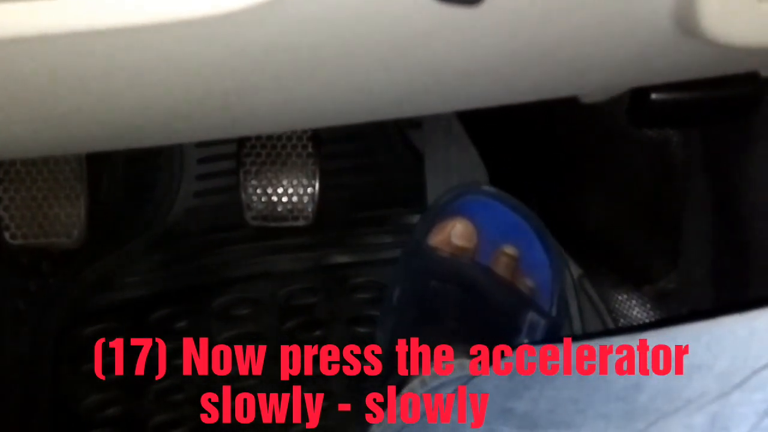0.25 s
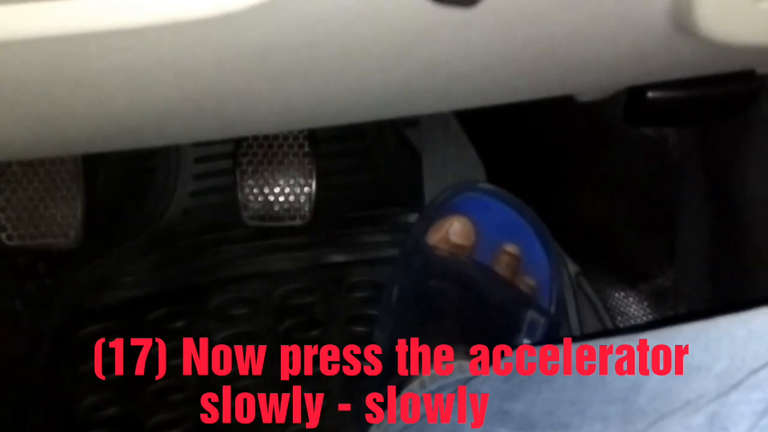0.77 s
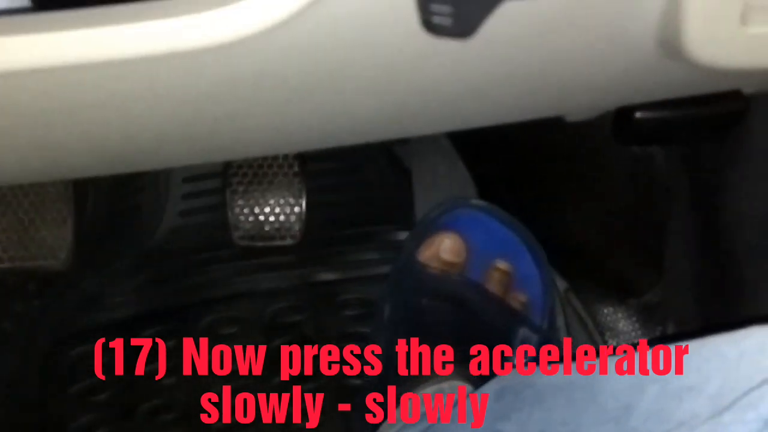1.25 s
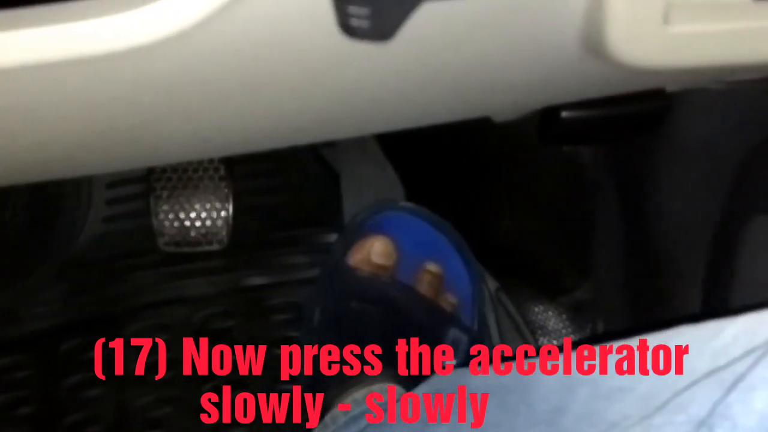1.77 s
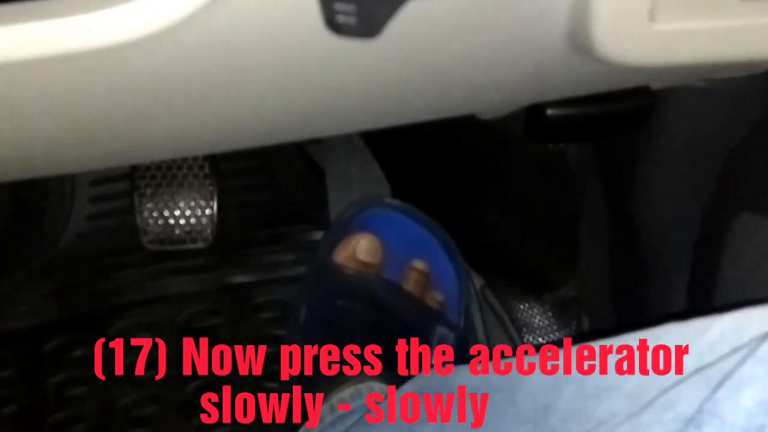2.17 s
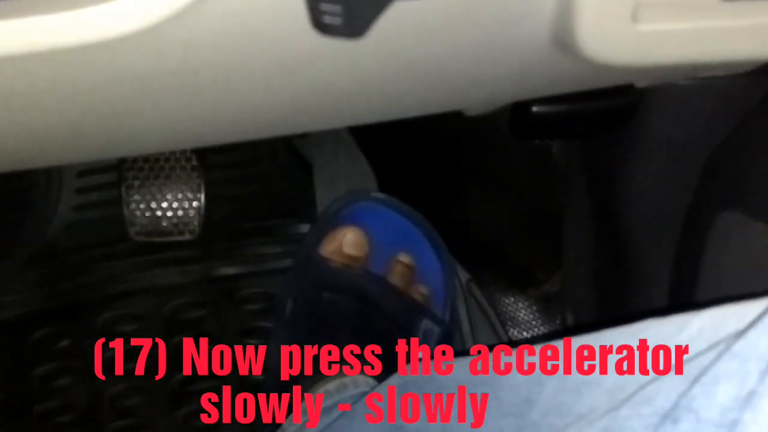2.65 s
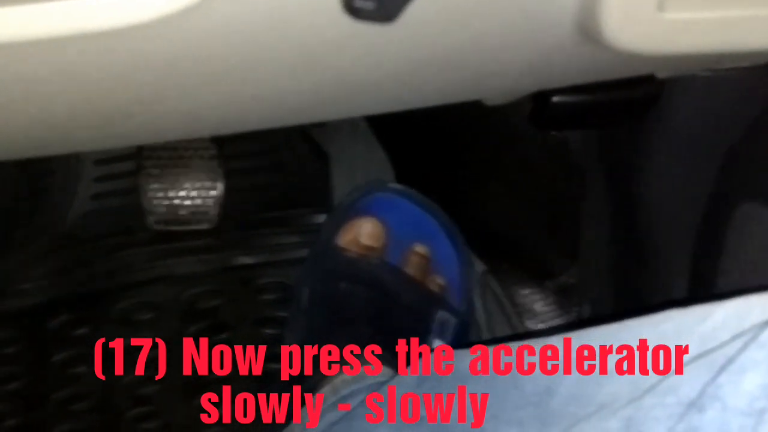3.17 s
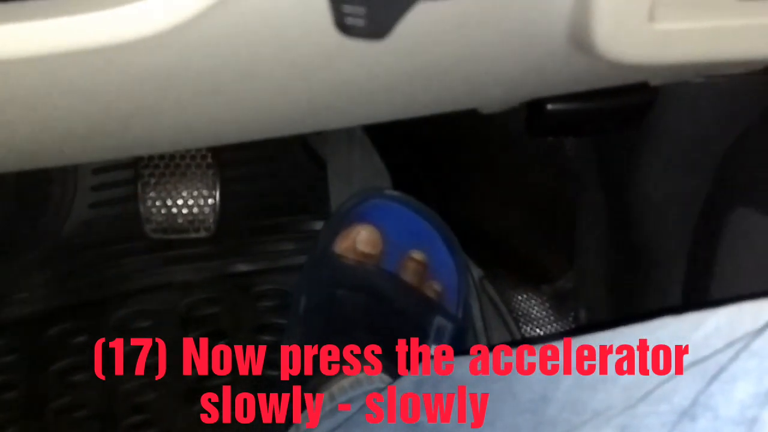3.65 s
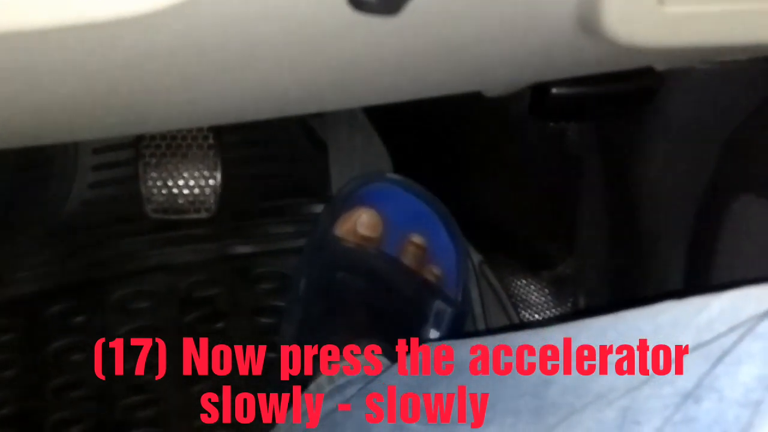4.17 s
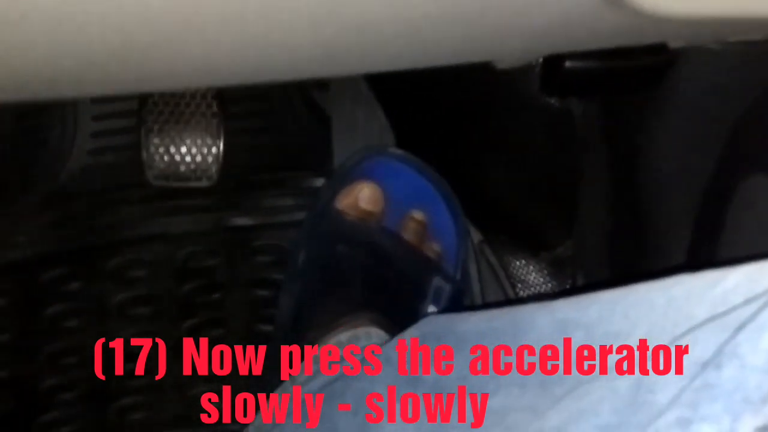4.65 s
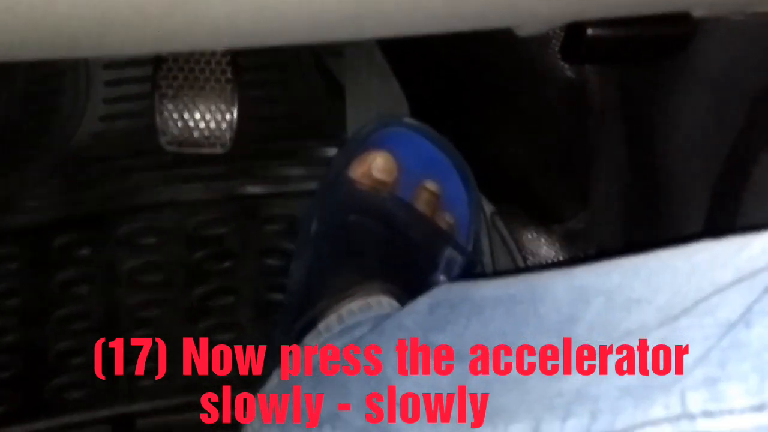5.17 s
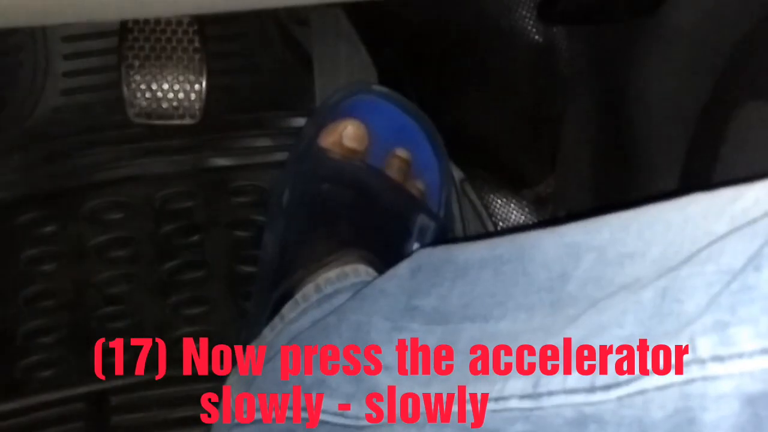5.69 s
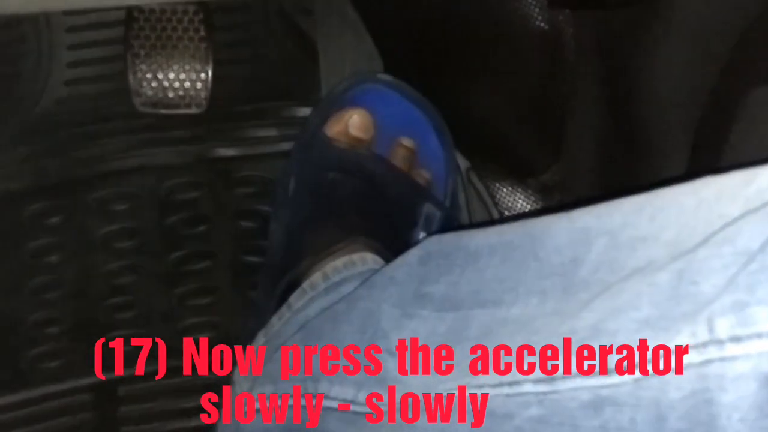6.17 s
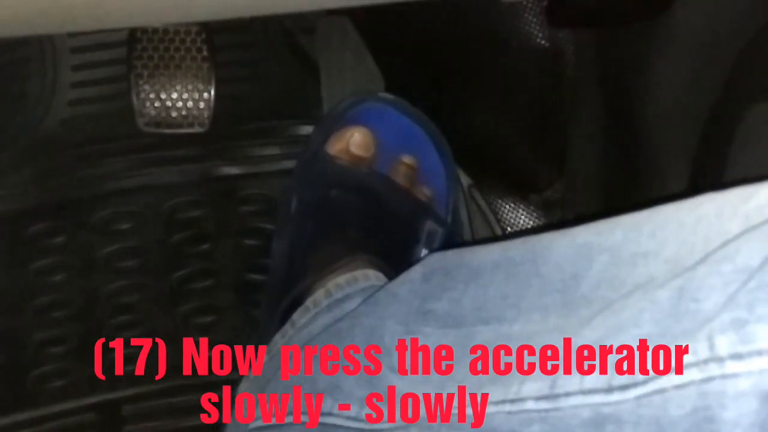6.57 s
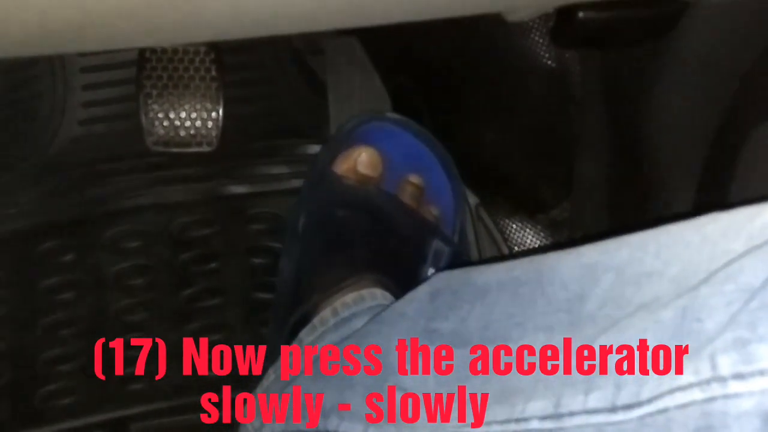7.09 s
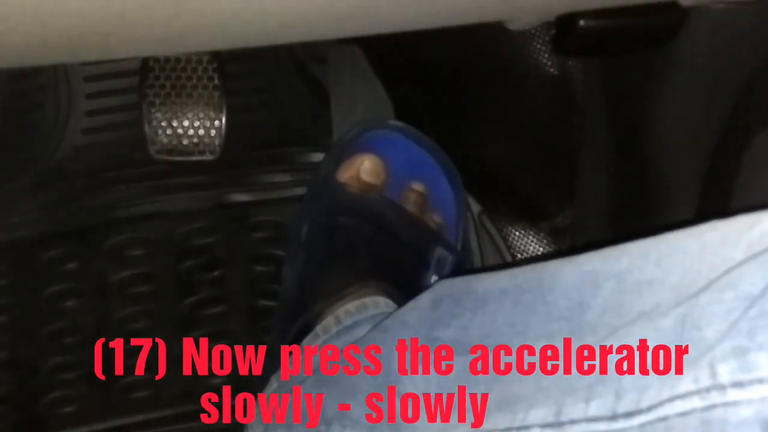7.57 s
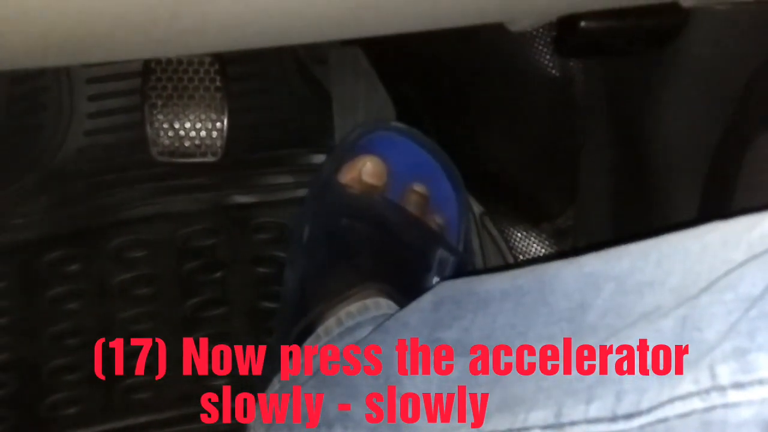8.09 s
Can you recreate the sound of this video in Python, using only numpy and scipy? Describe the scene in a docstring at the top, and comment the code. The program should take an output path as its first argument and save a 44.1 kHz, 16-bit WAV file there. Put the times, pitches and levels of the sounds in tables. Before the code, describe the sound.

Low, boomy engine rumble inside a car swells and falls twice, settles to idle, then climbs smoothly, while a hand rustles and a shoe knocks.

```python
"""Car engine heard from the footwell

A three-cylinder engine near idle is blipped twice, sinks back, then is revved gently. Sines on its orders
sweep through cabin resonances, over noise for the rough rumble, a trailing hum, a fuzzy buzz and a pump hum.
Shaped noise gives a hand rustling by the left microphone port, cloth shuffling and a sole scraping.
Short pulses tick on the casing, and a foot's knocks ring the floor panel."""
import sys
import numpy as np
from scipy import signal
from scipy.io import wavfile
from scipy.ndimage import uniform_filter1d

SR = 44100
rng = np.random.default_rng(int(sys.argv[2]) if len(sys.argv) > 2 else 0)


def persist_wave(psi):
    """Save psi, clipped to +-1, as 16-bit WAV."""
    counts = np.round(np.clip(psi, -1, 1) * 32767).astype(np.int16)
    wavfile.write(sys.argv[1], SR, np.atleast_2d(counts).T)


def undo_db(level):
    """Turn decibels back into plain size, where 20 dB means ten times bigger."""
    steps = np.asarray(level, float) / 20
    return 10 ** steps


N = 367352
TIME = np.arange(N) / SR
HOP = 256  # samples between the values of a slow curve
HZ = np.fft.rfftfreq(4096, 1 / SR)

# Engine speed. Each row: time in s, firings per s.
SPEED = [(0.0, 20.05), (0.15, 21.9), (0.3, 25.5), (0.5, 31.6), (0.6, 36.8), (0.7, 39.9), (0.8, 41.95),
         (0.9, 43.35), (1.0, 43.0), (1.1, 40.1), (1.3, 35.1), (1.4, 30.65), (1.5, 28.55), (1.65, 28.25),
         (1.8, 28.35), (2.0, 29.2), (2.35, 31.05), (2.5, 30.45), (2.7, 28.4), (3.0, 26.65), (3.3, 25.3),
         (3.6, 24.4), (3.9, 22.7), (4.2, 22.0), (4.9, 21.6), (5.2, 21.35), (5.6, 20.65), (6.6, 20.75),
         (6.8, 21.8), (7.0, 24.2), (7.15, 27.4), (7.3, 29.15), (7.6, 31.85), (8.33, 34.3)]
# Strong upper orders ahead of the cabin. Each row: multiple of the two-turn cycle, rms level in dB.
ORDERS = [(4, -39), (6, -38.5), (9, -45), (10, -48.5), (12, -52.5), (15, -42.5), (18, -51), (21, -46.5),
          (24, -49), (27, -49.5), (30, -48.5), (33, -54), (36, -51.5), (39, -58.5), (42, -51), (45, -55.5),
          (46, -48.5)]
# Body's answer to the firings at steady speed. Each row: frequency in Hz, rms level in dB.
BOOM = [(20.5, -23), (22, -22.5), (24.5, -21), (26.8, -23), (28.3, -25), (29.3, -28.5), (30.5, -26.5),
        (33, -33), (36.5, -27), (40, -25), (43.3, -33.5)]
# Body's answer to the crankshaft's once-a-turn shake. Each row: frequency in Hz, rms level in dB.
SHAKE = [(13.9, -36.5), (14.5, -50.5), (15.2, -29.5), (17, -36), (19, -38), (21, -45.5), (22.6, -35.5),
         (24, -24), (27, -28.5), (29, -26.5)]
# Resonances of body panels and cabin air. Each row: frequency in Hz, width in Hz, gain in dB.
CABIN = [(31, 13, -16), (38, 3, 6), (59, 3.3, 0), (136.6, 6.7, -9), (195.6, 8.9, -6), (261, 5.5, -10.5),
         (301.4, 31, -12.5), (351.3, 16.4, -14.5), (402, 5.1, -17), (516, 8.5, -28), (607.5, 41, -25.5),
         (2190, 150, -43.5)]
# Transmission between the resonances. Each row: frequency in Hz, gain in dB.
BULKHEAD = [(10, -16), (80, -9), (135, -18), (230, -30), (700, -35), (1400, -41), (2200, -46.5),
            (4000, -48.5), (8000, -62)]
# Resonances that ring on after an order has passed. Each row: frequency in Hz, width in Hz, lift in dB.
RINGING = [(26.92, 3.5, 0.5), (103.78, 3.66, 14)]
# Rumble ahead of the cabin. Each row: frequency in Hz, relative level in dB.
RUMBLE_COLOUR = [(11, 11), (16, 14.5), (25, 8.5), (35, 9), (55, 0.0), (80, 5.5), (100, -2), (150, -0.5),
                 (300, -3), (450, 0.5)]
# Trailing hum. Each row: frequency in Hz, rms level in dB.
TRAIL = [(80, -60.5), (90, -49.5), (95, -49), (99, -47), (103, -58), (108, -62), (120, -54)]
# Pump tones. Each row: frequency in Hz, rms level in dB.
PUMP = [(86.6, -57), (173.2, -57)]
# Likeness of the two ports. Each row: frequency in Hz, likeness from 0 to 1.
LIKENESS = [(60, 0.94), (130, 1), (290, 0.63), (640, 0.47), (1400, 0.19), (3000, 0.12)]
# Balance of the two ports. Each row: frequency in Hz, left over right in dB.
LEAN = [(60, 2.2), (150, 0.4), (300, 2.5), (600, -1.8), (1500, 1), (5000, 4), (15000, 2.5)]
# Microphone noise. Each row: frequency in Hz, relative density in dB per Hz.
HISS_COLOUR = [(880, -18.5), (1500, -10.5), (2800, -9.5), (5170, -15), (8670, -10.5), (11400, -7.5),
               (14400, -21), (15400, -48.5)]
# Strokes of skin on the casing. Each row: peak time in s, rms level in dB, rise in s, fall in s.
SKIN_STROKES = [(1.0, -56.5, 0.17, 0.45), (1.25, -53, 0.22, 0.063), (1.46, -63.5, 0.13, 0.11),
                (1.75, -60, 0.23, 0.16), (1.99, -64, 0.059, 0.21), (2.22, -62, 0.09, 0.18),
                (2.55, -62, 0.12, 0.12), (2.88, -65.5, 0.087, 0.1), (3.135, -72.5, 0.08, 0.094),
                (3.86, -61.5, 0.4, 0.11), (4.168, -68, 0.016, 0.012), (4.567, -71, 0.0058, 0.08),
                (4.65, -59, 0.033, 0.038), (4.692, -56, 0.051, 0.0037), (4.716, -59.5, 0.012, 0.12),
                (5.306, -53, .012, 0.023), (5.32, -58.5, 0.44, 0.12), (5.66, -60.5, 0.53, 0.11),
                (5.97, -67.5, 0.37, 0.3)]
# Skin friction. Each row: frequency in Hz, relative density in dB per Hz.
SKIN_COLOUR = [(2060, -37.5), (3500, -11.5), (4430, -11.5), (8660, -7), (10300, -1), (12200, -3.5),
               (13600, -2.5), (15400, -26)]
# Balance of the skin friction. Each row: frequency in Hz, left over right in dB.
SKIN_LEAN = [(3000, 16), (8000, 14), (12000, 8), (15000, -1.5)]
# Duller strokes of cloth. Each row: peak time in s, rms level in dB, rise in s, fall in s.
CLOTH_STROKES = [(1.24, -61.5, 0.027, 0.042), (1.676, -62, 0.025, 0.057), (2.27, -68, 0.011, 0.04),
                 (2.54, -68, 0.069, 0.033), (3.69, -66.5, 0.034, 0.046), (4.705, -63.5, 0.035, 0.045),
                 (4.92, -73, 0.26, 0.45), (5.19, -66.5, 0.12, 0.05), (5.32, -60, 0.1, 0.11),
                 (5.6, -66, 0.21, 0.076)]
# Cloth friction. Each row: frequency in Hz, relative density in dB per Hz.
CLOTH_COLOUR = [(500, -17), (1000, 8.5), (1500, 7.5), (2300, 6.5), (3300, 6.0), (5000, -32.0)]
# Slides of sole on mat. Each row: peak time in s, rms level in dB, rise in s, fall in s.
SOLE_STROKES = [(5.135, -66, 0.012, .02), (5.2, -68, 0.019, 0.036), (5.275, -64, 0.029, 0.024),
                (5.47, -65.5, 0.02, 0.029), (5.535, -61, 0.013, 0.023), (5.6, -58.5, 0.042, 0.038),
                (5.7, -65.5, 0.036, .02)]
# Fingertip on the casing. Each row: start in s, peak of the dull push in dB, peak of the snap in dB,
# low edge of the snap in Hz, its high edge in Hz, its left over right in dB.
TICKS = [(1.6708, -34, -37.5, 3500, 9500, 1), (4.7106, -42, -34, 6000, 15000, 16)]
# Foot on floor and pedal. Each row: start in s, peak level in dB, length in s.
KNOCKS = [(.858, -54, .004), (4.899, -50, .006), (5.274, -50, .005), (5.3008, -28, .004),
          (5.3068, -29.5, .011)]
# Floor panel modes. Each row: frequency in Hz, relative level in dB, time to fall by 60 dB in s.
FLOOR_MODES = [(110, -2, .06), (176, 2, .09), (323, 0, .08), (480, -7, .02), (640, -8, .012),
               (800, -7, .011), (1050, -5, .01), (1390, -6, .009), (1690, -7, .009), (2230, -10, .009),
               (3000, -14, .008)]
# When the mid bands drop out. Each row: frequency in Hz, bar relative to the band's median level in dB.
FAINT = [(450, -80), (620, -14), (800, -6), (1100, -8), (1500, -6), (1950, -2.5), (2400, -5), (3000, -2.5),
         (3700, -5), (4400, -13), (5000, -40)]


def evened(x):
    """Normalisation: a signal divided by its root mean square has rms 1."""
    return x / np.sqrt(np.mean(x ** 2) + 1e-20)


def read(points, hz):
    """Interpolation: a spectrum is read along a logarithmic frequency axis."""
    f, value = np.transpose(points)
    return np.interp(np.log(hz + 1), np.log(f + 1), value)


def wander(rate, count):
    """Smoothed randomness: white steps averaged twice over 1 / rate s drift slowly, with rms 1."""
    steps = rng.standard_normal((count, N // HOP + 2))
    width = max(round(SR / HOP / rate), 1)
    once = uniform_filter1d(steps, width)
    return evened(uniform_filter1d(once, width))


def stretched(slow):
    """Interpolation: a curve spaced by HOP is filled in to every sample."""
    return np.interp(TIME, np.arange(len(slow)) * HOP / SR, slow)


def noise(gain, likeness, lean_db, size, patchy_db):
    """Partial coherence: two noises share a component; their spectrum drifts in patches of level."""
    step = len(HZ) // (size // 2)
    gain, likeness, lean_db = (v[::step, None] for v in (gain, likeness, lean_db))
    a, b, c, d, patch = rng.standard_normal((N * 4 // size + 5, size // 2 + 1, 5)).T
    patch = uniform_filter1d(patch, size=6, axis=0)
    patch = evened(uniform_filter1d(patch, size=6, axis=1))
    likeness = np.clip(likeness, 0, 1)
    left = a + 1j * b
    right = likeness * left + np.sqrt(1 - likeness ** 2) * (c + 1j * d)
    both = np.array([left * undo_db(lean_db / 2), right / undo_db(lean_db / 2)])
    shaped = both * gain * undo_db(patchy_db * patch)
    return signal.istft(shaped, nperseg=size, noverlap=size * 3 // 4)[1][:, :N]


def resonate(x, hz, width):
    """Resonance: a mode of peak gain 1 takes time to build up and to die away."""
    carrier = np.exp(2j * np.pi * hz * TIME)
    r = np.exp(-np.pi * width / SR)
    envelope = signal.lfilter([1 - r], [1, -r], x / carrier)
    return 2 * (carrier * envelope).real


def add(mix, s, sound, db, lean_db):
    """Superposition: a hit of given peak level is added, its balance split evenly between the ports."""
    gain = undo_db(db + np.array([[lean_db / 2], [-lean_db / 2]]))
    mix[:, round(s * SR):][:, :sound.shape[-1]] += gain * sound / abs(sound).max()


def stroke(rows):
    """Friction envelope: each rubbing movement swells roundly, uneven as the contact sticks and slips."""
    drop_db = 9.5  # fall one rise or fall time away from the peak
    power = 0
    for s, db, rise, fall in rows:
        away = abs(TIME - s) / np.where(TIME < s, rise, fall)
        power = power + undo_db(db - drop_db * away ** 2) ** 2
    return np.sqrt(power) * undo_db(1.2 * stretched(wander(40, count=1)[0]))


def hiss():
    """Independent noise: each microphone port adds its own uncorrelated hiss."""
    rms_db = -72
    smooth = noise(undo_db(read(HISS_COLOUR, HZ)), 0 * HZ, read(LEAN, HZ), size=512, patchy_db=.6)
    return undo_db(rms_db) * evened(smooth)


def pump():
    """Tonal hum: two steady tones waver slightly in level and phase, a little louder at the left port."""
    levels, slips = wander(4.9, count=2), wander(7.3, count=2)
    tones = 0
    for (hz, db), level, slip in zip(PUMP, levels, slips):
        phase = 2 * np.pi * hz * TIME + .5 * stretched(slip)
        tones = tones + undo_db(db + 2 * stretched(level)) * np.sin(phase)
    return np.sqrt(2) * tones * undo_db([[.6], [-.6]])


def knocks():
    """Modal ringing: a blow and a short scrape excite the decaying modes of the floor panel."""
    t, out = np.arange(4096) / SR, np.zeros((2, N))
    ring = sum(undo_db(db - 60 * t / t60) * np.sin(2 * np.pi * hz * t) for hz, db, t60 in FLOOR_MODES)
    grits = rng.standard_normal((len(KNOCKS), 2, 4096))
    for (s, db, length), grit in zip(KNOCKS, grits):
        rub = grit * np.exp(-(t / length) ** 2)
        rubbed = signal.fftconvolve(rub + .5 * rub[::-1], ring[None], axes=1)[:, :4096]
        body = evened(ring) + 1.3 * evened(rubbed)
        add(out, s, body + 0.2 * evened(rub), db, 1)
    return out


def ticks():
    """Impulsive contact: a quick double push, strongest on the left port, comes with a bright noisy snap."""
    t, out = np.arange(1024) / SR, np.zeros((2, N))
    peak_s = .0015  # from the start to the middle of the swell
    swell = np.exp(-(2 * t / peak_s - 2) ** 2)
    rebound = .3 * np.exp(-(t / peak_s - 1.3) ** 2)
    push = swell * (.3 * np.cos(2 * np.pi * 1300 * (t - peak_s)) - 1) + rebound
    grits = rng.standard_normal((len(TICKS), 1024))
    for (s, push_db, snap_db, low_hz, high_hz, lean_db), grit in zip(TICKS, grits):
        add(out, s, push, push_db, 14)
        band = signal.butter(2, [low_hz, high_hz], "band", fs=SR, output="sos")
        add(out, s, signal.sosfilt(band, swell ** 3 * grit), snap_db, lean_db)
    return out


def scrape():
    """Stick-slip: uneven slips of sole on mat each ring one broad resonance twice over."""
    hz, width_hz, slips_per_s = 1450, 600, 200
    happens = rng.random(N) < slips_per_s / SR
    slips = happens * undo_db(4 * rng.standard_normal(N)) * np.sign(rng.standard_normal(N))
    # the right port hears a delayed copy and the same slips in reverse order
    both = np.array([slips, .4 * np.roll(slips, 9) + .6 * slips[::-1]])
    rung = resonate(resonate(both, hz, width_hz), hz, width_hz)
    return evened(rung) * stroke(SOLE_STROKES)


def rustle():
    """Friction noise: bright rubbing of skin near the left port, and a duller shuffle of cloth."""
    skin = noise(undo_db(read(SKIN_COLOUR, HZ)), 0 * HZ + .15, read(SKIN_LEAN, HZ), size=256, patchy_db=1.5)
    cloth = noise(undo_db(read(CLOTH_COLOUR, HZ)), 0 * HZ + .3, 0 * HZ + 3, size=512, patchy_db=1.3)
    return evened(skin) * stroke(SKIN_STROKES) + evened(cloth) * stroke(CLOTH_STROKES)


def speed():
    """Inertia: firings per s, rounded by the flywheel; their slope shows load, -1 coasting to 1 open."""
    open_hz_per_s = 5.1  # speed-up of the two-turn cycle at which the throttle is well open
    firing_hz = uniform_filter1d(np.interp(TIME[::HOP], *np.transpose(SPEED)), size=15)
    rising = uniform_filter1d(np.gradient(firing_hz / 3, HOP / SR), size=40)
    return firing_hz, np.tanh(rising / open_hz_per_s)


def fuel_cut_db(load):
    """Overrun: the level falls, by 10 dB at most, as the throttle shuts past the cut-off load."""
    cut_load = -.7
    return -10 * np.clip((load - cut_load) / (-1 - cut_load), 0, 1)


def buzz():
    """Sympathetic vibration: probably loose trim, a fuzzy note pulsed by firings near one engine speed."""
    hz, width_hz = 875, 160
    rms_db, load_db = -73, 3.5  # at the liveliest speed before pulsing by load; swing with load
    liveliest_hz, span_hz = 29.2, 1.6  # firing rate, and the distance from it that costs 6 dB
    firing_hz, load = speed()
    level_db = rms_db - 6 * ((firing_hz - liveliest_hz) / span_hz) ** 2 + load_db * load
    pulse = 1 + .6 * np.sin(2 * np.pi * np.cumsum(stretched(firing_hz)) / SR)
    shaken = rng.standard_normal((2, N)) * pulse
    rung = resonate(resonate(shaken + .4 * shaken[::-1], hz, width_hz), hz, width_hz)
    return evened(rung) * stretched(undo_db(level_db))


def trail():
    """Delayed coupling: a hum, perhaps a loosely coupled shaft, follows late; loudest between 90 and 99 Hz."""
    lag_s, ratio = .16, 3.31  # hum frequency over firing rate
    firing_hz, load = (np.interp(TIME[::HOP] - lag_s, TIME[::HOP], v) for v in speed())
    hz = ratio * firing_hz
    waver, slip = map(stretched, wander(5, count=2))
    note = np.sin(2 * np.pi * np.cumsum(stretched(hz)) / SR + .5 * slip)
    level = stretched(undo_db(read(TRAIL, hz) + fuel_cut_db(load))) * undo_db(1.3 * waver)
    return np.sqrt(2) * level * note * undo_db([[.6], [-.6]])


def cabin(hz):
    """Transmission: gain from engine bay to footwell, resonances in power over a falling slope."""
    peaks = sum(undo_db(db) ** 2 / (1 + (2 * (hz - f) / width) ** 2) ** 1.062 for f, width, db in CABIN)
    return np.sqrt(peaks + undo_db(read(BULKHEAD, hz)) ** 2)


def rumble():
    """Broadband excitation: combustion and valve noise passes the cabin and grows with engine speed."""
    idle_hz, idle_db, db_per_octave = 22.44, -58, 6.5  # firing rate, and rms from 220 to 900 Hz there
    load_db = 0.34  # swing with load
    gain = cabin(HZ) * undo_db(read(RUMBLE_COLOUR, HZ))
    x = noise(gain, read(LIKENESS, HZ), read(LEAN, HZ), size=4096, patchy_db=2.5)
    middle = (HZ > 220) & (HZ < 900)
    share = np.sqrt((gain[middle] ** 2).sum() / (gain ** 2).sum())
    firing_hz, load = speed()
    level_db = idle_db + db_per_octave * np.log2(firing_hz / idle_hz) + load_db * load
    return evened(x) / share * stretched(undo_db(level_db))


def engine():
    """Harmonic orders: sines on multiples of the two-turn cycle swell at each resonance and change with load."""
    boom_load_db, shake_load_db, orders_load_db = 2, -1, 2  # swing from steady to open, reversed in coasting
    body_lag_s = 0.056  # the heavy body takes a moment to build up and die away
    firing_hz, load = speed()
    cycle_hz = firing_hz / 3
    cycle = 2 * np.pi * np.cumsum(stretched(cycle_hz)) / SR
    sway = wander(22.0, count=2)[:, :len(load)]
    late_hz = np.interp(TIME[::HOP] - body_lag_s, TIME[::HOP], cycle_hz)
    boom = stretched(undo_db(read(BOOM, 3 * late_hz) + boom_load_db * load + .35 * sway[0]))
    shake = stretched(undo_db(read(SHAKE, 2 * late_hz) + shake_load_db * load + 3.6 * sway[1]))
    ahead = np.array([[0], [.1]])  # the bass reaches the right port first, in radians
    out = boom * np.sin(3 * cycle + ahead) * undo_db([[.2], [-.2]])
    out = out + shake * np.sin(2 * cycle + 1.3 + ahead)
    # unequal cylinders fill in the orders between, from the fifth up, falling 9.5 dB per octave
    orders = {k: -41.5 - 9.5 * np.log2(k / 5) for k in range(5, 33)} | dict(ORDERS)
    effort_db = orders_load_db * load + fuel_cut_db(load)
    chance = wander(10.2, count=2 * len(orders))[:, :len(cycle_hz)]
    # no two firings are alike: each order wavers in level and phase
    for (k, db), waver, slip in zip(orders.items(), chance[::2], chance[1::2]):
        hz = k * cycle_hz
        size = cabin(hz) * undo_db(db + effort_db + 2 * waver)
        lean = undo_db(read(LEAN, hz) / 2)
        phase = k * cycle + stretched(.012 * k * slip) + 2 * np.pi * rng.random()
        apart = 0.055 * np.arccos(np.clip(read(LIKENESS, hz), 0, 1))
        out[0] += stretched(size * lean) * np.sin(phase)
        out[1] += stretched(size / lean) * np.sin(phase + stretched(apart))
    return np.sqrt(2) * out


def scene():
    """Superposition: the engine's sounds also ring slow resonances, and all other sources are added."""
    drive = engine() + rumble() + trail()
    body = drive + sum(undo_db(db) * resonate(drive, hz, width) for hz, width, db in RINGING)
    return body + buzz() + pump() + rustle() + scrape() + ticks() + knocks()


def mid_dropouts(x):
    """Dropouts: faint mid bands fall by 30 dB frame by frame, sooner when the treble is loud."""
    hz, _, z = signal.stft(x, SR, "cosine", nperseg=2048)
    power = abs(z) ** 2
    treble_db = 10 * np.log10(power[:, hz > 6000].mean(1, keepdims=True) + 1e-20)
    quiet_db = np.percentile(treble_db, 30, axis=2, keepdims=True)
    busy_db = np.maximum(treble_db - quiet_db, 0)
    bands = power[:, :1024].reshape(2, 128, 8, -1).mean(2)  # eight bins to a band
    bands_db = 10 * np.log10(bands.repeat(8, axis=1) + 1e-20)
    usual_db = np.median(bands_db, axis=2, keepdims=True)
    bar_db = usual_db + read(FAINT, hz[:1024])[:, None] + 0.63 * busy_db
    bar_db += 2.5 * rng.standard_normal(treble_db.shape)  # the bar jumps from frame to frame
    gain = np.concatenate([undo_db(-30 * (bands_db < bar_db)), np.ones_like(treble_db)], axis=1)
    return signal.istft(z * gain, SR, "cosine", nperseg=2048)[1][:, :N]


def band_limit(x):
    """A steep low-pass at the top of the band."""
    return signal.sosfilt(signal.butter(12, 15560, fs=SR, output="sos"), x)


def record(dry):
    """Reception: microphone noise joins the sound, faint mid bands drop out and the treble is cut off."""
    edge = signal.firwin(255, 14900, fs=SR)[None]  # low-pass edge in Hz
    thinned = mid_dropouts(dry + hiss())
    return band_limit(signal.oaconvolve(thinned, edge, "same"))


dry = scene()
out = record(dry)
persist_wave(out)
```